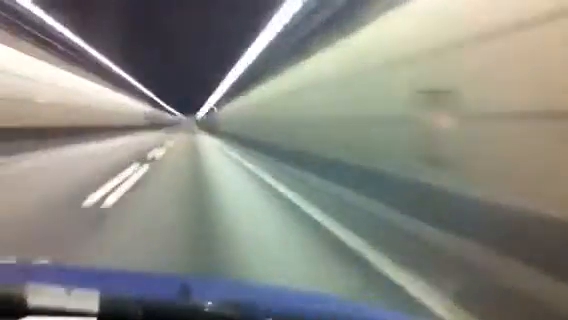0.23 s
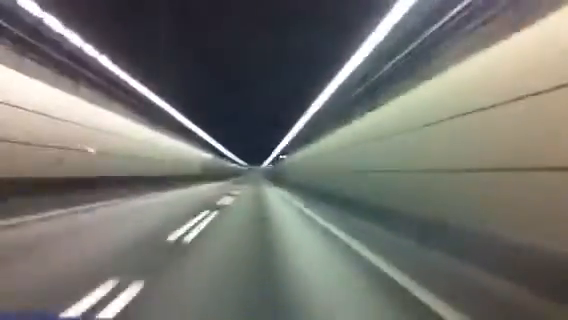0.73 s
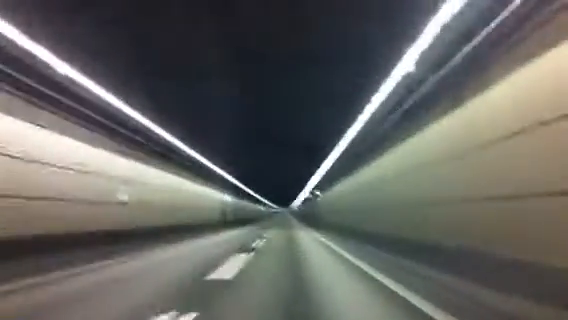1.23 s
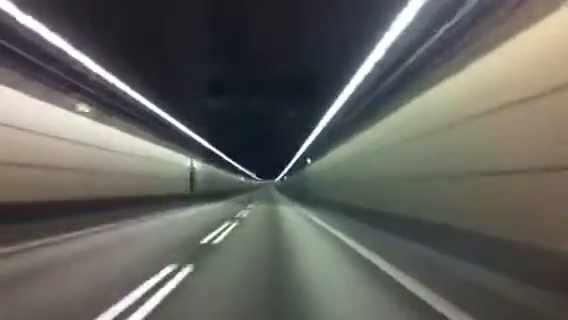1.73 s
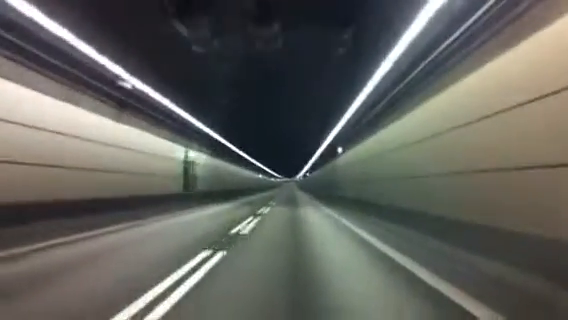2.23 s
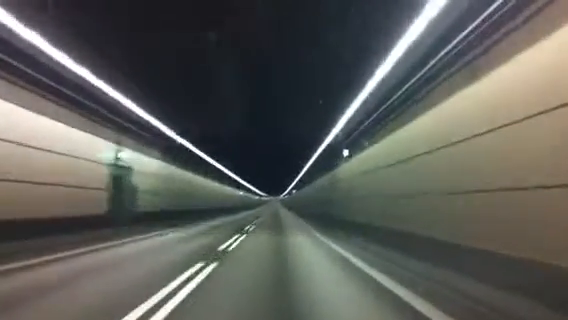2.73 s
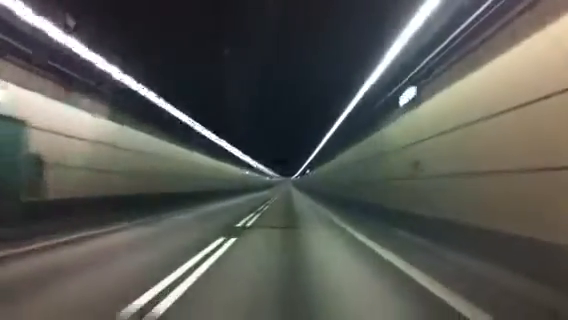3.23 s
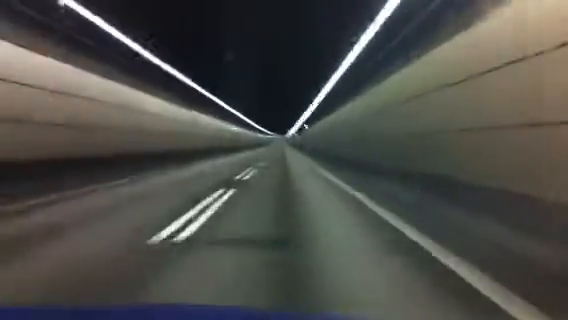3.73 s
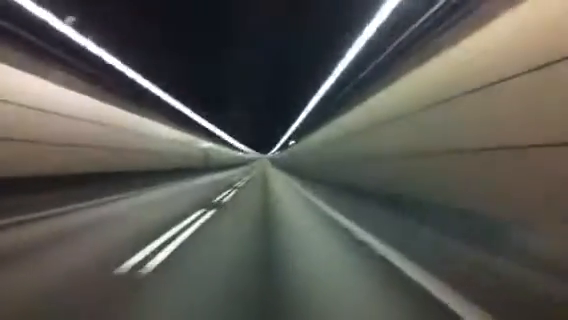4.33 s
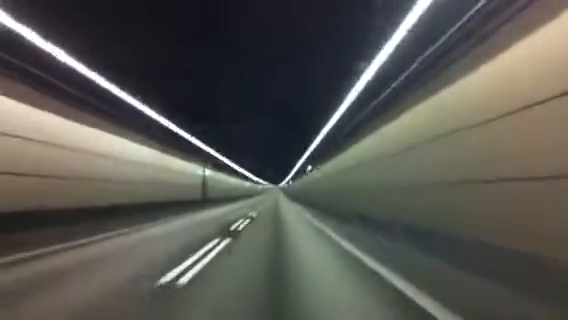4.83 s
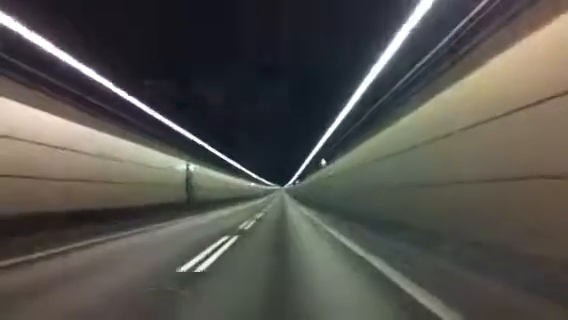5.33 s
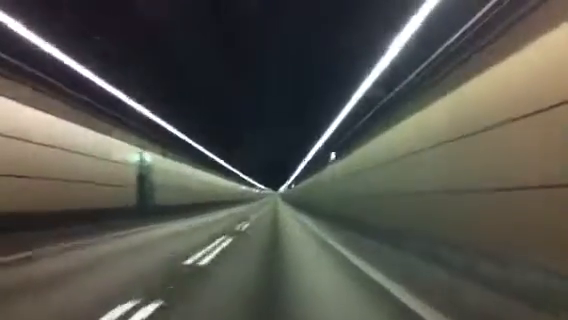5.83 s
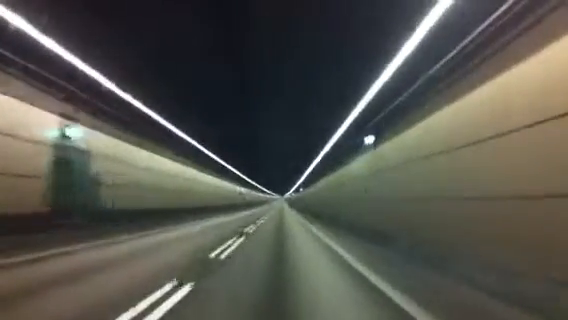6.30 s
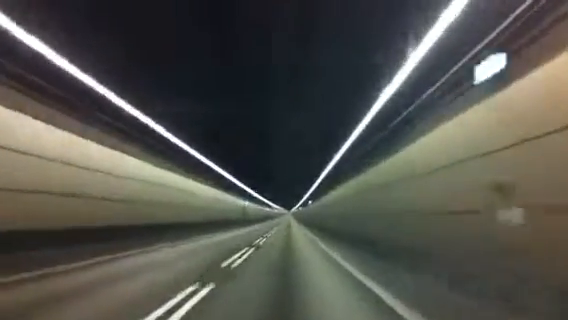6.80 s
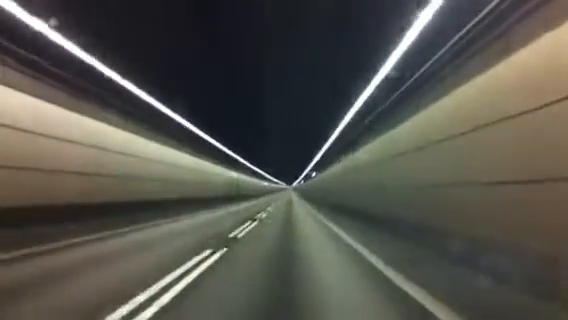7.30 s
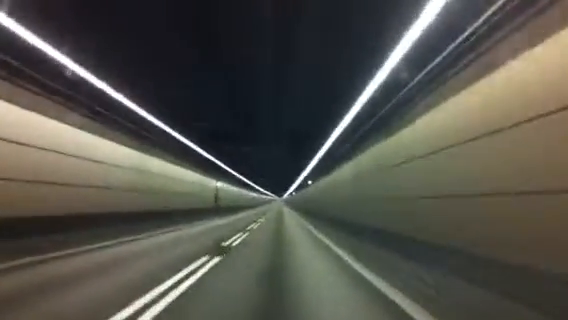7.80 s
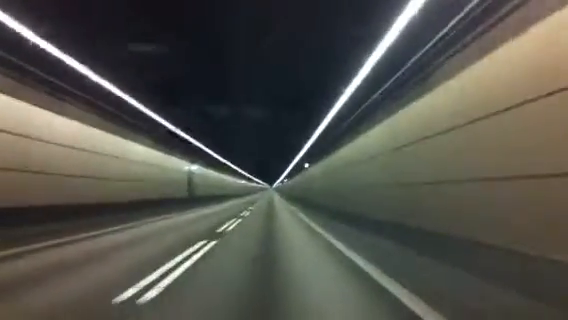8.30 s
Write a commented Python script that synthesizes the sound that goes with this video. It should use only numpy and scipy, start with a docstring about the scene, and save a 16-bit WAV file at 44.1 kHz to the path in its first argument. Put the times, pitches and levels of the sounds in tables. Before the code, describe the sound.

A car cruises through a road tunnel, heard from inside: droning road rumble, tyre roar, soft rushing air and a faint rattle.

```python
"""Inside a car at a steady speed in a road tunnel, heard from a phone behind the windscreen.
The road shakes the body into a rumble, tyre roar comes back from the tunnel walls, and air rushes past
the glass over a faint hiss. The cabin colours rumble, roar and rush; bands of noise swell and sink.
There are faint dry rustles, and a small loose part buzzes in short fits as the car vibrates."""
import sys
import numpy as np
from scipy import signal
from scipy.fft import rfft, irfft
from scipy.io import wavfile
from scipy.ndimage import uniform_filter1d

SR = 44100
rng = np.random.default_rng(int(sys.argv[2]) if len(sys.argv) > 2 else 0)


def output_pcm(signal):
    """Save a mono or channel-first signal as 16-bit PCM at the path in sys.argv[1].

    Samples are clipped to [-1, 1] before scaling.
    """
    pcm = np.clip(np.atleast_2d(signal).T, -1, 1) * 32767
    wavfile.write(sys.argv[1], SR, np.round(pcm).astype(np.int16))


N = 377055
TIME = np.arange(N) / SR
FREQS = np.maximum(np.fft.rfftfreq(N, 1 / SR), 1)


def undb(db):
    """Turns decibels into a gain, the number a sound is multiplied by."""
    return 10 ** (np.asarray(db) / 20)


def curves(table):
    """Joins a table's points with straight lines in time, one curve for each column of levels."""
    times, *columns = np.transpose(table)
    return [np.interp(TIME, times, column) for column in columns]


def swell(middle_s, spread_s):
    """A bell-shaped rise and fall around a moment."""
    return np.exp(-.5 * ((TIME - middle_s) / spread_s) ** 2)


def colour(points):
    """A gain for every frequency, drawn through (frequency [Hz], level [dB]) points."""
    hz, db = np.transpose(points)
    return undb(np.interp(np.log(FREQS), np.log(hz), db))


def filtered(sound, gain):
    """Turns each frequency of a sound up or down by its gain."""
    return irfft(rfft(sound) * gain, N)


def noise(gain):
    """Noise shaped by a gain curve, with an average strength (rms) of 1."""
    shaped = filtered(rng.standard_normal(N), gain)
    return shaped / np.std(shaped)


def steady(sound, span_s):
    """Evens out swells slower than span_s to a strength of 1 and keeps the quick flutter."""
    size = max(int(span_s * SR), 1)
    power = uniform_filter1d(uniform_filter1d(sound ** 2, size), size)
    return sound / np.sqrt(power + 1e-12)


def cabin():
    """Gain of the cabin: sound bouncing inside forms standing waves that lift or cancel narrow bands."""
    # peaks and dips at the phone: (frequency [Hz], width [Hz], lift [dB])
    standing_waves = [(96, 8.1, 7), (124.2, 17, 7), (173, 23, 2.5), (202, 14.4, -3.5), (217, 16, 5.5),
                      (242.6, 30, 3), (269, 13, -3), (279, 19, 1), (523, 32, -5.5), (570, 22, 2),
                      (606, 22, -4.5), (641, 30, 4.5), (727, 22, 1), (790, 26, 2.5), (864, 18, -4),
                      (894, 11, 4), (962, 28, 1.5), (1014, 22, -1.5), (1132, 24, 0.5), (1174, 40, -5.5),
                      (1215, 18, 3), (1520, 70, -1.5), (2090, 153, -1), (2255, 100, 2.5), (2790, 110, 1.5)]
    return undb(sum(db / (1 + (2 * (FREQS - hz) / width) ** 2) for hz, width, db in standing_waves))


def rumble(drone_db):
    """The road shakes the car's body: four low booms come and go under an even drone."""
    # tone of the shaking body: (frequency [Hz], level [dB])
    body_tone = [(20, -50), (36, -34), (75, -18), (110, -5.5), (170, 3.5), (300, -3.5), (470, -8),
                 (700, -22.5), (1500, -59.5)]
    # the deep, low, middle and upper boom: (lower edge [Hz], upper edge [Hz])
    booms = [(20, 82.5), (82.5, 140), (140, 197), (197, 265)]
    # the upper boom as it comes and goes: (time [s], level [dB])
    upper_boom = [(0, -32.5), (0.25, -38.5), (0.48, -40), (0.76, -33), (1.15, -38.5), (1.4, -35),
                  (1.62, -38.5), (1.76, -32), (2.05, -32), (2.55, -35.5), (2.85, -33.5), (3.0, -37),
                  (3.25, -32.5), (3.75, -31), (4.42, -32.5), (4.58, -33), (4.75, -32.5), (5.55, -32.5),
                  (5.75, -34), (6.25, -33.5), (6.47, -36.5), (6.7, -32), (6.95, -34.5), (7.3, -30.5),
                  (7.5, -32), (7.9, -33), (8.15, -31), (8.55, -34)]
    # brief swells and dips in one boom's level: (middle [s], spread [s], boom [Hz], lift [dB])
    boom_swells = [(0.82, .09, 170, -3), (1.09, 0.031, 170, 4.5), (1.36, 0.06, 170, 4),
                   (1.78, 0.13, 170, 2.5), (1.7, 0.17, 110, 2.5), (1.77, .14, 50, 4), (2.15, .2, 170, 1.5),
                   (2.23, .07, 110, 3), (2.8, 0.08, 110, 4.5), (2.95, 0.2, 50, 2.5), (3.14, .12, 170, 3),
                   (3.25, 0.13, 110, 3.2), (3.83, 0.046, 170, 3), (3.768, 0.027, 220, 2),
                   (3.452, .04, 220, 1.5), (4.33, 0.1, 110, 4), (4.33, .08, 50, 4.5),
                   (4.584, .05, 110, -4.5), (5.406, 0.035, 170, 6), (5.72, .06, 110, -2),
                   (5.962, 0.022, 170, 7.5), (5.98, .06, 50, 4), (6.46, 0.071, 110, -3.5),
                   (6.71, 0.023, 170, 9), (7.25, 0.095, 170, 3.5), (7.37, .06, 50, 4),
                   (7.62, 0.083, 110, 4.5), (8.3, .07, 110, 2.5)]
    body = colour(body_tone) * cabin()
    above_booms = FREQS >= booms[-1][1]
    out = steady(noise(body * above_booms), span_s=0.15) * undb(drone_db)
    # the three lower booms each follow a share of the drone's rise and fall
    usual_db = np.mean(drone_db)
    drift_db = drone_db - usual_db
    deep_db = usual_db - 23 + 0.6 * drift_db
    low_db = usual_db - 4 + 0.81 * drift_db
    middle_db = usual_db - 0.5 + 0.32 * drift_db
    for (low, high), db in zip(booms, [deep_db, low_db, middle_db, *curves(upper_boom)]):
        swell_db = sum(lift * swell(s, spread) for s, spread, hz, lift in boom_swells if low <= hz < high)
        band = (FREQS >= low) & (FREQS < high)
        out += steady(noise(body * band), span_s=0.2) * undb(db + swell_db)
    return out


def tyres(roar_db):
    """Tread roar, smoothed by countless wall echoes, comes in through doors and glass."""
    # tone of the roar: (frequency [Hz], level [dB])
    roar_tone = [(200, -26), (550, -2.5), (720, -1), (1000, -7), (1500, -17), (3000, -40), (6000, -63)]
    return steady(noise(colour(roar_tone) * cabin()), span_s=0.3) * undb(roar_db)


def air(rush_db, hiss_db):
    """Air rushes along the window seals, with a thin even hiss above it."""
    # tones of the rush and of the hiss: (frequency [Hz], level [dB])
    rush_tone = [(700, -54), (1750, 3), (2600, 2), (3100, -6.5), (3800, -17.5), (6000, -44)]
    hiss_tone = [(1500, 0), (4800, -1), (6500, -2.5), (8500, -7.5), (11000, -10), (15500, -13)]
    rush = noise(colour(rush_tone) * cabin()) * undb(rush_db)
    hiss = noise(colour(hiss_tone)) * undb(hiss_db)
    return rush + hiss


def swelling_bands():
    """Bands of noise, narrow or wide, that swell and sink in the roar and the air rush."""
    # each band: (middle [s], spread [s], pitch [Hz], width [Hz], level [dB])
    bands = [(0.15, 0.25, 3200, 980, -64.5), (0.96, 0.3, 1800, 690, -56.5), (1.38, 0.34, 2430, 160, -54.5),
             (2.2, 0.6, 2340, 130, -57), (1.94, 0.5, 1120, 42, -52), (1.06, 0.35, 738, 30, -43.5),
             (2.15, 0.55, 782, 22, -44), (2.6, 0.69, 730, 20, -40.6), (2, 0.7, 675, 27, -47),
             (4.1, 0.4, 780, 85, -45), (4.04, 0.11, 2480, 380, -53), (4.7, 0.09, 2540, 600, -52.5),
             (4.54, 0.65, 892, 29, -47.5), (5.47, 0.19, 643, 32, -43), (6.1, 0.25, 738, 70, -47),
             (5.95, 0.95, 962, 40, -48.5), (6.43, 0.12, 2400, 400, -55), (6.46, 0.98, 1320, 300, -54.5),
             (6.5, 1.5, 850, 31, -49), (6.1, 1.45, 1930, 190, -57)]
    out = np.zeros(N)
    for middle_s, spread_s, hz, width_hz, db in bands:
        band = 1 / (1 + (2 * (FREQS - hz) / width_hz) ** 4)
        out += steady(noise(band), span_s=0.19) * undb(db) * swell(middle_s, spread_s)
    return out


def rustles(rough_db, rough_hz):
    """Soft, bright rustles close to the phone; a quick flicker in level makes them scratchy."""
    # tone of a rustle: (frequency [Hz], level [dB])
    rustle_tone = [(2500, -14), (4000, 5), (5300, 2), (7000, -2), (9000, 0), (12000, 1), (15400, -2)]
    # each rustle or scrape: (middle [s], spread [s], level [dB])
    scrapes = [(.2, .2, -65), (1.002, 0.31, -65.5), (1.245, .012, -68), (1.462, .007, -65),
               (1.85, .12, -68), (2.52, .05, -68), (3.21, .009, -60), (3.32, .05, -68), (3.68, .01, -65),
               (3.85, .1, -72), (3.858, .01, -65), (4.26, .02, -67), (4.322, .01, -62),
               (4.388, 0.026, -58.5), (4.866, .007, -65), (5.855, .008, -62), (5.9, .06, -68),
               (5.936, .01, -62), (6.8, .09, -69), (7.19, .05, -67), (7.52, .05, -70)]
    grain = noise(colour(rustle_tone)) * undb(rough_db * noise(FREQS < rough_hz))
    loudness = sum(undb(db) * swell(middle_s, spread_s) for middle_s, spread_s, db in scrapes)
    return grain / np.std(grain) * loudness


def shakes(period_s=0.0553, jitter_s=.001, scatter_db=1.0, scatter_hz=230):
    """The loose part rocks at its own rate, in fits; gives each shake's time, level and ring."""
    # fits of buzzing: (start [s], shakes [count], level [dB], ring pitch [Hz], ring gain [dB])
    fits = [(0.051, 1, -59, 11600, 7), (0.119, 1, -54, 11530, 6), (0.229, 3, -57.5, 11200, 8),
            (0.456, 1, -63, 11700, 9), (0.646, 1, -60.5, 11700, 7), (0.972, 6, -62.5, 11500, 7),
            (1.651, 2, -58.5, 10300, 2), (1.825, 3, -59.5, 10600, 2), (2.458, 3, -59, 11000, -1),
            (3.262, 3, -61, 11100, 6), (3.746, 5, -60.5, 11250, 6), (4.094, 1, -61, 11200, 10),
            (4.321, 4, -62, 11000, 6), (4.591, 6, -62, 11100, 7), (5.762, 2, -67, 11000, 4),
            (5.877, 3, -61, 11000, 0), (6.122, 1, -62, 11400, 2), (6.312, 1, -63, 11600, 8),
            (6.437, 1, -62, 11600, 6), (6.54, 2, -61.5, 11600, 4), (6.713, 4, -61.5, 10800, 2),
            (7.108, 3, -61, 11500, 6), (7.478, 3, -60, 11900, 6), (8.137, 2, -62, 11900, 2)]
    for start_s, count, db, hz, ring_db in fits:
        for k in range(round(count)):
            from_middle = (2 * k + 1) / round(count) - 1
            force, seating, late = rng.standard_normal(3)
            time_s = start_s + k * period_s + jitter_s * late
            level_db = db - 3 * from_middle ** 2 + scatter_db * force  # a fit is weaker at its ends
            yield time_s, level_db, hz + scatter_hz * seating, ring_db


def press(lag_s, rise_s=.0045, fall_s=.011):
    """How hard the part presses on its seat in one contact: a quick rise and a longer fall."""
    return np.exp(-np.where(lag_s < 0, .5 * (lag_s / rise_s) ** 2, np.abs(lag_s / fall_s) ** 1.3))


def loose_part(contacts_per_s, ring_width_hz, rough_db, rough_hz):
    """On every shake the part grazes its seat, then chatters on it: tiny contacts that make it ring."""
    # tone of the contacts: (frequency [Hz], level [dB])
    buzz_tone = [(2500, -18), (4000, -4), (5300, -5), (6500, -6), (9200, -10), (10200, -3.5), (11700, -2),
                 (12400, -8), (14000, -9), (15400, -7.5)]
    # the part's other ringing notes: (pitch [Hz], gain against the main ring [dB])
    side_notes = [(5200, 1), (15050, -3.5)]
    graze_lead_s, graze_db = .019, -12  # the light touch before each full contact
    touches = rng.random(N) < contacts_per_s / SR
    contacts = filtered(touches * rng.standard_normal(N), colour(buzz_tone))
    contacts *= undb(rough_db * noise(FREQS < rough_hz))
    out = np.zeros(N)
    for time_s, db, ring_hz, ring_db in shakes():
        near = slice(max(int((time_s - .05) * SR), 0), int((time_s + .08) * SR))
        ring = 0
        for hz, note_db in [(ring_hz, 0), *side_notes]:
            resonance = signal.iirpeak(hz, hz / ring_width_hz, fs=SR)
            ring += undb(note_db) * signal.lfilter(*resonance, contacts[near])
        chatter = contacts[near] + undb(ring_db) * ring
        lag_s = TIME[near] - time_s
        pressure = press(lag_s) + undb(graze_db) * press(lag_s + graze_lead_s)
        out[near] += chatter / np.std(chatter) * pressure * undb(db)
    return out


def scene():
    """Everything that reaches the phone, in one channel."""
    # levels along the drive: (time [s], body drone [dB], tyre roar [dB], air rush [dB], hiss [dB])
    drive = [(0, -34, -38, -55.5, -58), (0.38, -36, -38, -55, -60), (0.63, -35.5, -37.5, -50, -60),
             (0.95, -36, -37, -48, -59.5), (1.35, -37, -35.5, -49.5, -61.4), (1.65, -36.5, -36.4, -50, -64),
             (2.6, -35.5, -36, -50, -64), (3.4, -35, -35.5, -48.5, -63), (3.7, -33.5, -35.5, -48.5, -63),
             (5.05, -33.5, -36, -49.5, -63), (5.5, -33.5, -35.5, -48, -63.3), (6.1, -34, -36, -48, -62),
             (6.3, -35, -36, -47.5, -61), (6.65, -36.5, -35.5, -48, -62), (7.4, -34, -35.5, -47.5, -62.5),
             (8.55, -33.5, -35, -48.5, -63)]
    drone_db, roar_db, rush_db, hiss_db = curves(drive)
    mix = rumble(drone_db) + tyres(roar_db) + swelling_bands() + air(rush_db, hiss_db)
    mix += rustles(rough_db=2.5, rough_hz=140)
    mix += loose_part(contacts_per_s=30000, ring_width_hz=720, rough_db=1.2, rough_hz=110)
    return mix[None]


def record(dry):
    """The phone cuts the highest treble; the sound fades in and out without a click."""
    top_hz, fade_s = 15800, .004
    fade = np.minimum(np.minimum(TIME, TIME[::-1]) / fade_s, 1)
    treble_cut = signal.ellip(10, .1, 80, top_hz, fs=SR, output="sos")
    return signal.sosfilt(treble_cut, dry * fade)


dry = scene()
out = record(dry)
output_pcm(out)
```